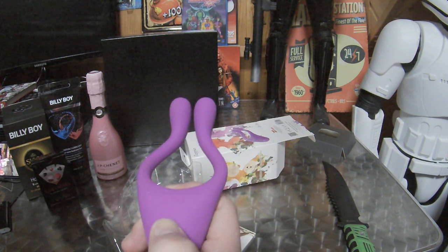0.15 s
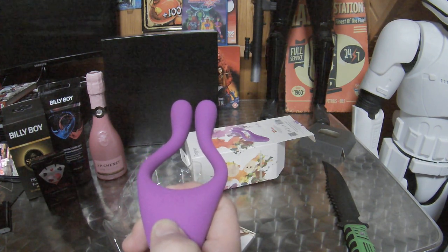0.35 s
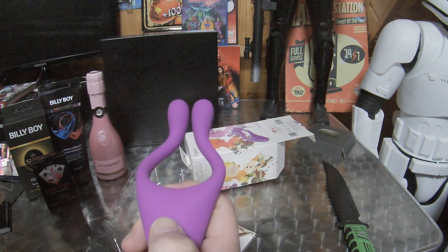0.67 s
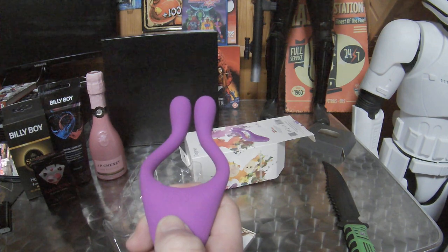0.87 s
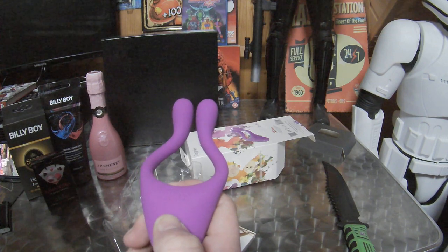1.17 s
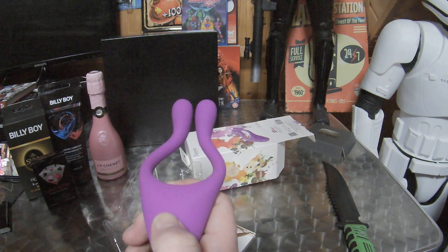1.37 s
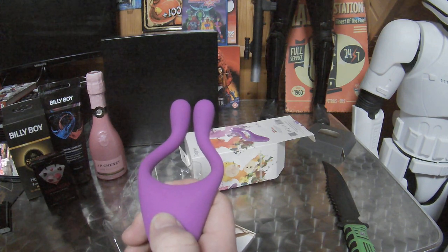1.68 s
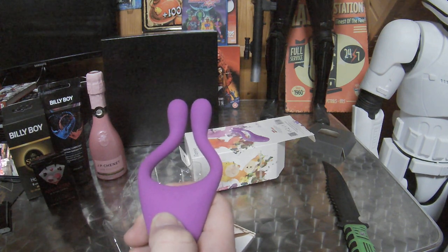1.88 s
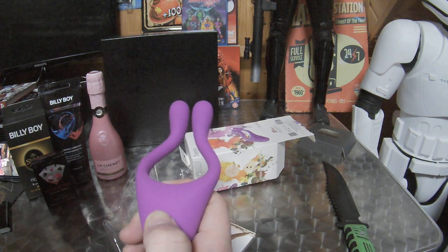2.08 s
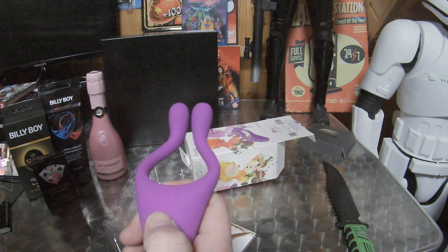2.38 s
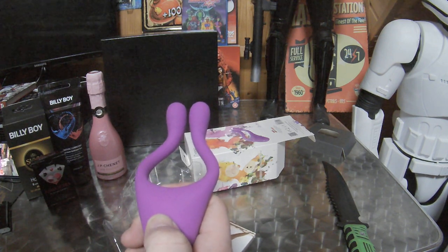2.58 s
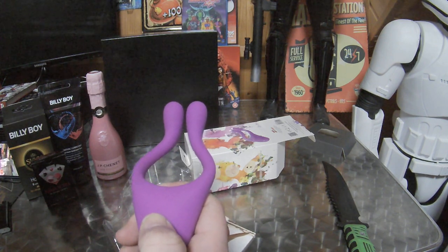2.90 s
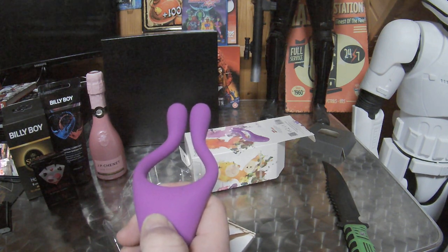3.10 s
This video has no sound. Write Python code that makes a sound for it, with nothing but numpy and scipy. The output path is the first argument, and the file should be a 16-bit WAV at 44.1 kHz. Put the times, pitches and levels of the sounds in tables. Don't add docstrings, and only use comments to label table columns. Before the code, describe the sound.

A small handheld vibrating device hums low and steady with a faint high scrape, while a thumb presses and releases its button four times, close to the microphone in a quiet room with light hiss.

```python
import sys
import numpy as np
from scipy import signal
from scipy.fft import rfft, irfft
from scipy.io import wavfile
from scipy.ndimage import uniform_filter1d, map_coordinates

SR = 44100
rng = np.random.default_rng(int(sys.argv[2]) if len(sys.argv) > 2 else 0)


def level_to_linear(level):
    exponent = np.asarray(level, float) / 20
    return 10 ** exponent


def master_out(mix):
    frames = np.transpose(np.atleast_2d(mix))
    ceiling = np.clip(frames, -1, 1)
    pcm = np.round(ceiling * 32767).astype(np.int16)
    wavfile.write(sys.argv[1], SR, pcm)


N = 143325
CLICK_LEN = 4410
BAND_EDGE_HZ = 13960

# t/s, level/dB, tick against dome/dB, dome brightness/dB
PRESSES = [
    (0.1031, -15, -0.7, -1),
    (0.9666, -12.5, 0.2, -2.8),
    (1.9982, -14.5, 0.7, 1.5),
    (2.8388, -14, -0.3, 0.1),
]
# t/s, level/dB, tick against dome/dB, dome brightness/dB
RELEASES = [
    (0.2487, -18.5, 0.1, 0.1),
    (1.1084, -18, 0.1, 0.1),
    (2.153, -18, 0.1, 0.1),
    (2.9898, -18, 0.1, 0.1),
]


def evened(x):
    return x / np.sqrt(np.mean(x ** 2) + 1e-20)


def read(points, hz):
    f, value = np.transpose(points)
    return np.interp(np.log(hz + 1), np.log(f + 1), value)


def drift(top_hz):
    t = np.arange(N) / SR
    waves = [np.sin(2 * np.pi * (f * t + rng.random())) / np.sqrt(f)
             for f in np.geomspace(1, top_hz, num=16)]
    return evened(sum(waves))


def causal(points, lag_ms=0, sudden=1):
    hz = np.fft.rfftfreq(8192, 1 / SR)
    log_gain = np.log(level_to_linear(read(points, hz)))
    mirrored = np.concatenate([log_gain, log_gain[-2:0:-1]])
    phase = -signal.hilbert(mirrored)[:len(hz)].imag
    delay = 2j * np.pi * hz * lag_ms / 1000
    return irfft(np.exp(log_gain + 1j * sudden * phase - delay))[:CLICK_LEN]


def coloured(x, points):
    hz = np.fft.rfftfreq(N, 1 / SR)
    band = (hz > 1) * (hz < BAND_EDGE_HZ)
    return np.sqrt(SR / 2) * irfft(rfft(x) * level_to_linear(read(points, hz)) * band, N)


def spin(motor):
    # t/s, fast motor f/Hz, slow motor f/Hz
    speed = [
        (0, 168, 129.7),
        (.23, 167.8, 129.3),
        (.31, 161, 122.3),
        (1.09, 159.6, 121.7),
        (1.17, 166.2, 126.6),
        (2.12, 166, 126.8),
        (2.22, 168, 128.8),
        (3.14, 168, 128),
        (3.25, 163, 126),
    ]
    at = np.transpose(speed)
    waver_hz = .15
    turn_hz = np.interp(np.arange(N) / SR, at[0], at[motor]) + waver_hz * drift(12)
    return np.cumsum(turn_hz) / SR + rng.random()


def motors(spins):
    # multiple of speed, fast motor level/dB, slow motor level/dB
    partials = [(1, -60.5, -62), (2, -85, -82)]
    # t/s, level/dB
    effort = [(0, 2.5), (.24, 3.5), (.32, -3), (1.05, -0.2), (1.2, -0.9), (1.9, -0.5), (2.06, 3.5),
              (2.4, -0.5), (3.25, 1.4)]
    waver_db = .5
    effort_db = np.interp(np.arange(N) / SR, *np.transpose(effort))
    out = np.zeros(N)
    for motor, turns in enumerate(spins, 1):
        tone = sum(level_to_linear(row[motor]) * np.sqrt(2) * np.sin(2 * np.pi * round(row[0]) * turns)
                   for row in partials)
        out += tone * level_to_linear(waver_db * drift(10) + (motor == 1) * effort_db)
    return out


def brushes(spins):
    # f/Hz, level per Hz/dB
    port = [(5500, -125), (7000, -106), (8000, -95), (9000, -95.5), (9650, -96), (10800, -114),
            (12300, -109), (13300, -116)]
    throbs = [(1, .2), (2, .3), (3, .18), (4, .1)]
    brush_db = [-2.8, -4.6]
    repeat, renew_turns = .55, 14
    out = np.zeros(N)
    for turns, db in zip(spins, brush_db):
        size = round(SR / np.mean(np.diff(turns) * SR))
        pattern = rng.standard_normal((60, size + 1))
        place = [turns / renew_turns, np.round(turns % 1 * size)]
        again = evened(map_coordinates(pattern, place, order=1))
        throb = 1 + sum(depth * np.cos(2 * np.pi * (k * turns + rng.random())) for k, depth in throbs)
        scrape = np.sqrt(repeat) * again + np.sqrt(1 - repeat) * rng.standard_normal(N)
        out += level_to_linear(db) * evened(throb * scrape)
    return coloured(out, port) * level_to_linear(.25 * drift(60))


def whine(turns):
    multiple, width_hz, level_db, end_s = 17.3, 120, -76, .27
    wobble = evened(uniform_filter1d(rng.standard_normal(N), round(SR / width_hz)))
    fade = np.clip((end_s - np.arange(N) / SR) / .03, 0, 1)
    return level_to_linear(level_db) * wobble * np.sin(2 * np.pi * multiple * turns) * fade


def click(kind, tick_db, bright_db):
    # f/Hz, press level/dB, release level/dB
    dome_colour = [(1200, -54, -47), (2440, -49.5, -41.5), (3274, -33, -25), (3850, -18.5, -10),
                   (4640, -29, -20), (5640, -24, -18.5), (6720, -33, -22.5), (9000, -79, -71)]
    # f/Hz, press level/dB, release level/dB
    tick_colour = [(5960, -67, -55), (7240, -34.5, -35.5), (8500, -12.5, -15), (9260, -13, -16.5),
                   (10120, -21.5, -27.5), (11640, -42.5, -49), (12180, -28.5, -29.5), (14900, -47, -60)]
    tick_lag_ms = [0.087, 0.444]
    # f/Hz, press level/dB, release level/dB, t60/s
    shell = [(3760, -34, -22, .032), (4106, -35, -20, .03), (4300, -44, -30, .03),
             (5220, -35.5, -31, 0.058), (7700, -35, -30, 0.085), (8530, -26, -25, 0.036),
             (8740, -37, -41, 0.023), (9110, -32, -32, .025), (10030, -41, -38, 0.028)]
    # delay/ms, level/dB
    echoes = [(1.3, -16), (2.4, -9), (3.6, -25), (4.6, -23), (5.3, -19.5), (7.2, -19.5)]
    # f/Hz, level/dB
    bounce = [(2000, -2.5), (4000, 1.5), (5500, -6.5), (7500, 4.5), (9000, -3.5), (11000, -2), (14400, -27)]
    t = np.arange(CLICK_LEN) / SR
    chance = rng.standard_normal(len(shell))
    lag_ms, sudden = .9, .62
    dome = [(row[0], row[kind] + bright_db * (row[0] > 5000)) for row in dome_colour]
    tick = [(row[0], row[kind] + tick_db) for row in tick_colour]
    tick_pulse = causal(tick, lag_ms + tick_lag_ms[kind - 1], sudden)
    snap = level_to_linear(33.5) * (causal(dome, lag_ms, sudden) - tick_pulse)
    ring = np.zeros(CLICK_LEN)
    for row, c in zip(shell, chance):
        decay = level_to_linear(row[kind] + 3.0 * c - 60 * t / row[3])
        ring += decay * np.sin(2 * np.pi * row[0] * (1 + 0.0042 * c) * t + c)
    ring *= np.clip((t - .0008) / 0.00089, 0, 1)
    echo = np.zeros(CLICK_LEN)
    for (ms, db), c in zip(echoes, chance[::-1]):
        echo += level_to_linear(db + 1.3 * c) * np.roll(snap, round((ms + .08 * c) * SR / 1000))
    return snap + np.convolve(echo, causal(bounce)[:256])[:CLICK_LEN] + ring


def button():
    out = np.zeros(N + CLICK_LEN)
    for kind, rows in ((1, PRESSES), (2, RELEASES)):
        for s, db, tick_db, bright_db in rows:
            out[round(s * SR):][:CLICK_LEN] += level_to_linear(db) * click(kind, tick_db, bright_db)
    slip_s, slip_db = 2.9885, -30
    slip = causal([(4000, -25), (7000, 12), (9000, -6), (13000, 1), (15000, -30)], .5, .5)
    out[round(slip_s * SR):][:CLICK_LEN] += level_to_linear(slip_db) * slip
    return out[:N]


def room(x):
    # f/Hz, t60/s
    decay = [(2000, .12), (4000, 0.22), (6000, 0.21), (9000, 0.15), (14000, 0.13)]
    taps = np.zeros(SR // 2)
    at = np.arange(120, len(taps) - 20, 20)
    taps[at + rng.integers(0, 20, len(at))] = rng.choice([-1., 1.], len(at))
    hz, t, z = signal.stft(taps, SR, nperseg=128)
    dying = level_to_linear(-60 * t / read(decay, hz)[:, None])
    tail = signal.istft(z * dying, SR, nperseg=128)[1]
    return signal.fftconvolve(x, tail / np.linalg.norm(tail))[:N]


def room_tails(clicks):
    # f/Hz, level/dB
    tail_colour = [(2000, -5), (4100, -1), (5500, -3), (7200, 8.5), (9000, -4.5), (11500, 6), (13600, 7),
                   (14400, -50)]
    fed = np.convolve(clicks, causal(tail_colour)[:256])[:N]
    starts = sorted(row[0] - .005 for row in PRESSES + RELEASES)
    which = np.searchsorted(starts, np.arange(N) / SR)
    wet = sum(room(fed * (which == k)) for k in range(1, which.max() + 1))
    return irfft(rfft(wet) * (np.fft.rfftfreq(N, 1 / SR) < BAND_EDGE_HZ), N)


def hiss():
    # f/Hz, level per Hz/dB
    flicker = [(4, -74), (25, -73), (100, -84), (250, -92), (600, -98.5), (1200, -102), (2500, -103),
               (6500, -109)]
    return coloured(rng.standard_normal(N), flicker)


def scene():
    clicks = button()
    spins = [spin(1), spin(2)]
    device = motors(spins) + brushes(spins) + whine(spins[0]) + clicks
    return (device + level_to_linear(-17) * room_tails(clicks))[None]


def roll_off(x):
    return signal.sosfilt(signal.butter(12, 15290, fs=SR, output="sos"), x)


def record(dry):
    low_pass = signal.firwin(255, 15200, window=("kaiser", 9), fs=SR)
    x = signal.oaconvolve(dry, low_pass[None], "same")
    offset = .008
    return roll_off(x + hiss() + offset)


dry = scene()
out = record(dry)
master_out(out)
```